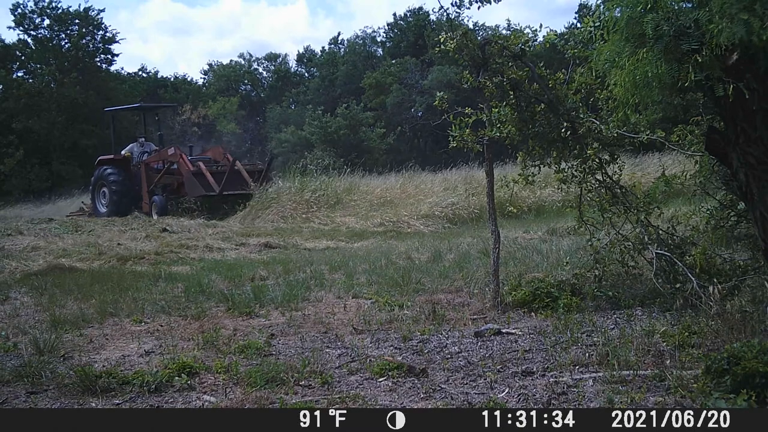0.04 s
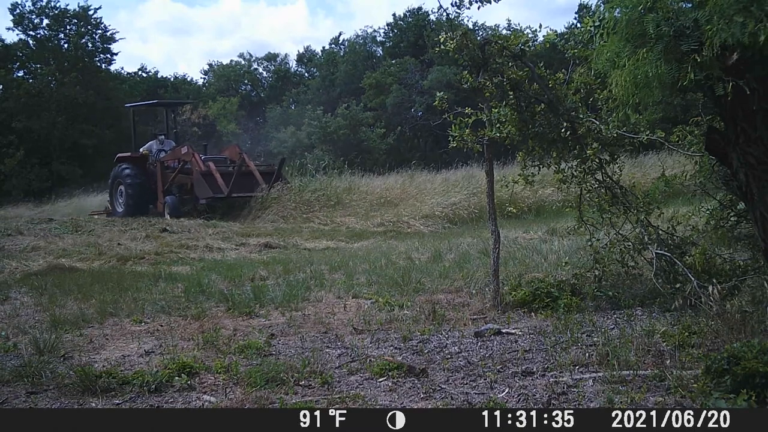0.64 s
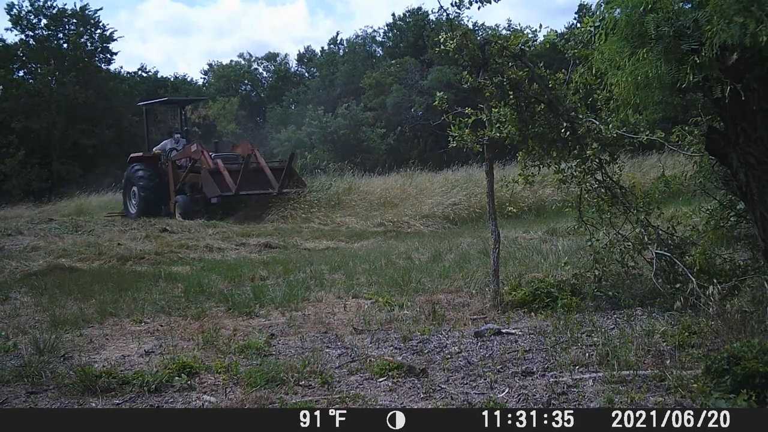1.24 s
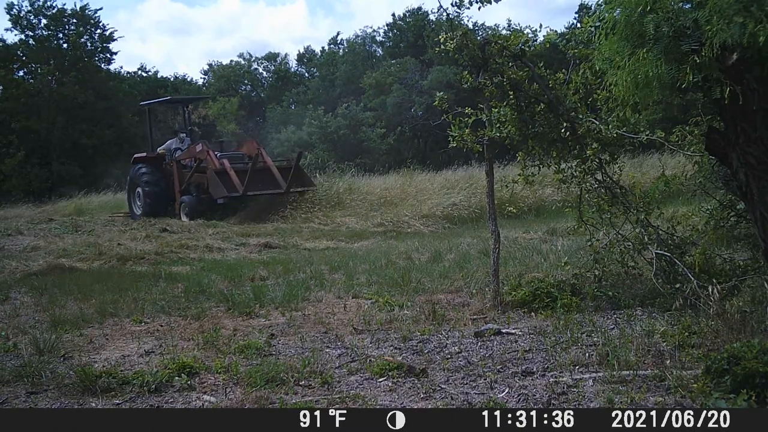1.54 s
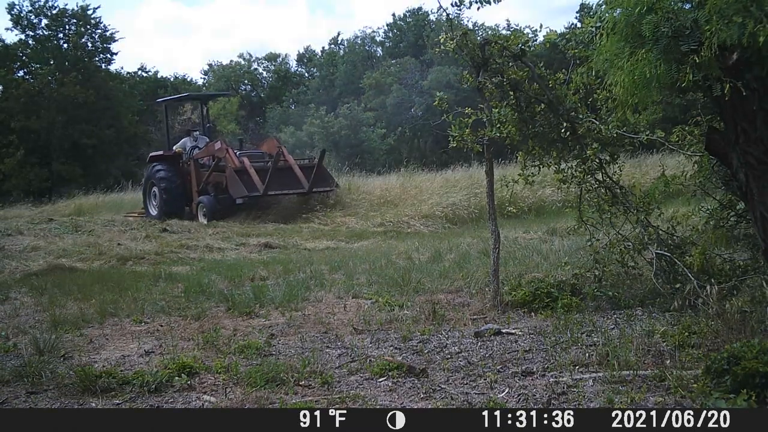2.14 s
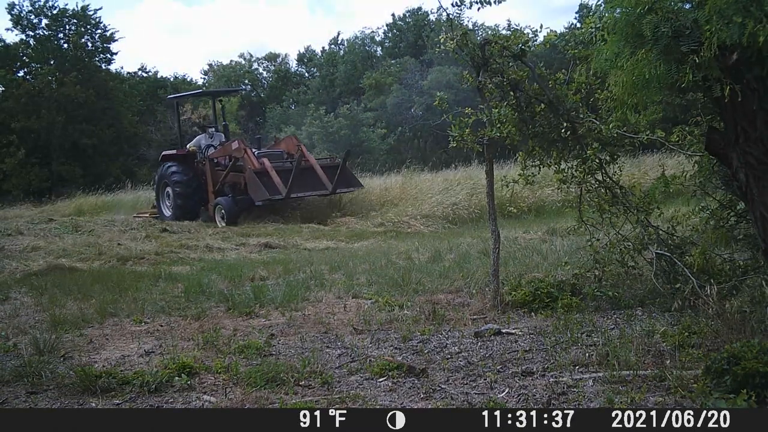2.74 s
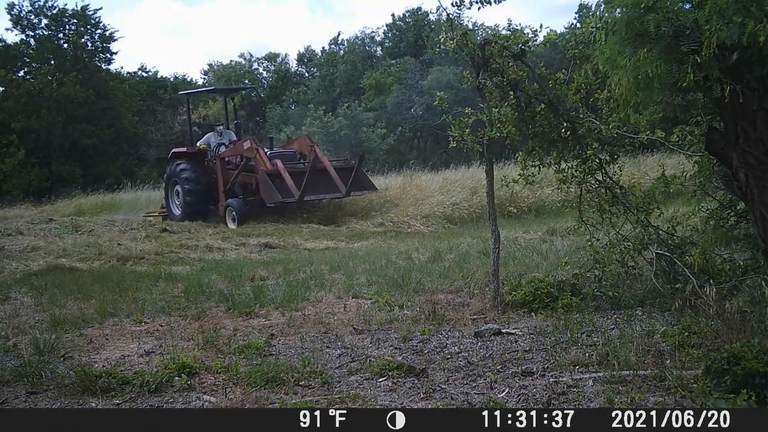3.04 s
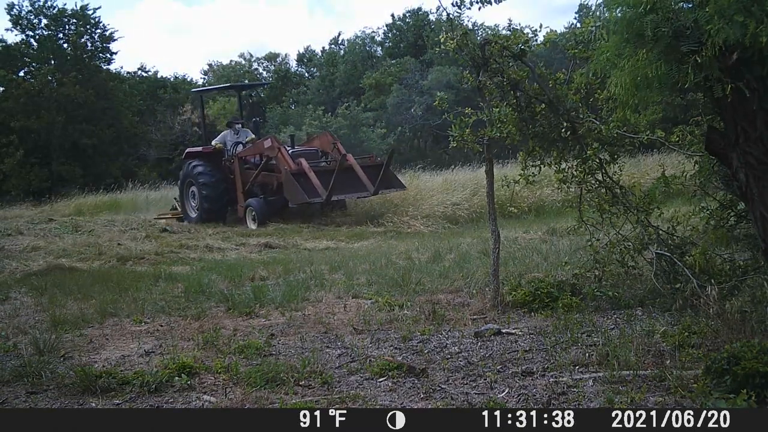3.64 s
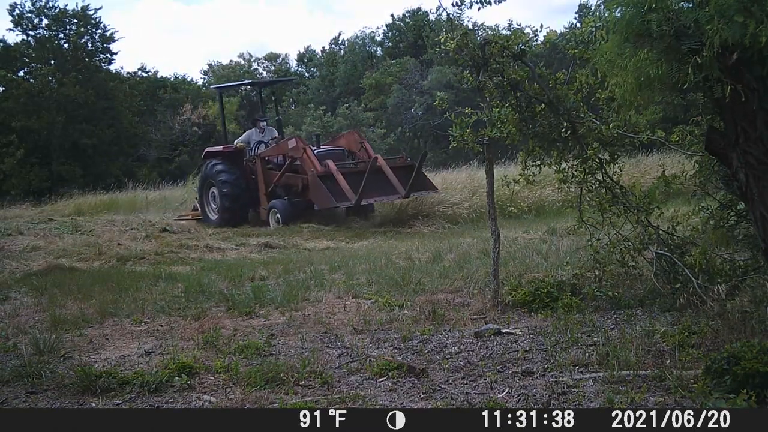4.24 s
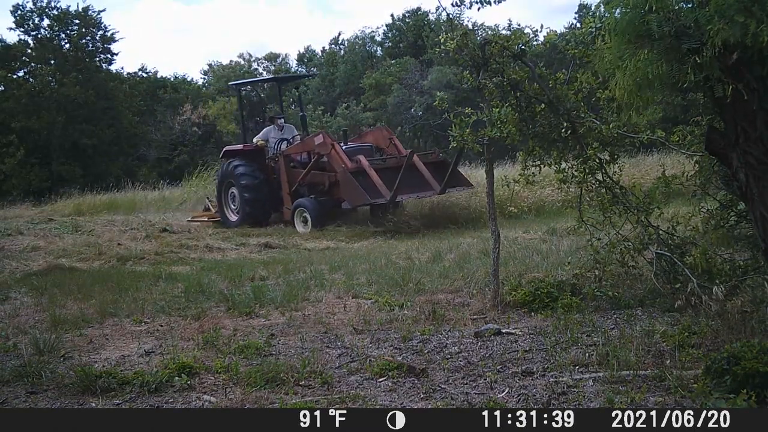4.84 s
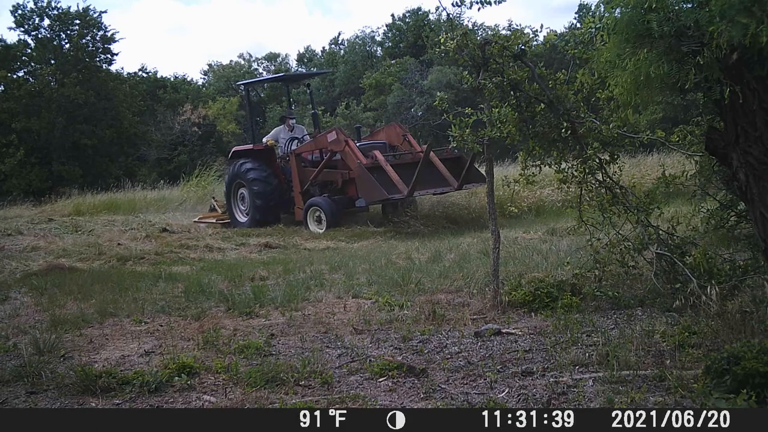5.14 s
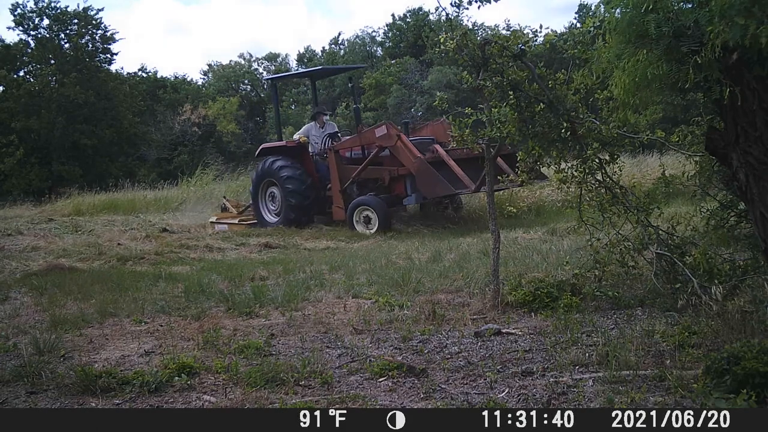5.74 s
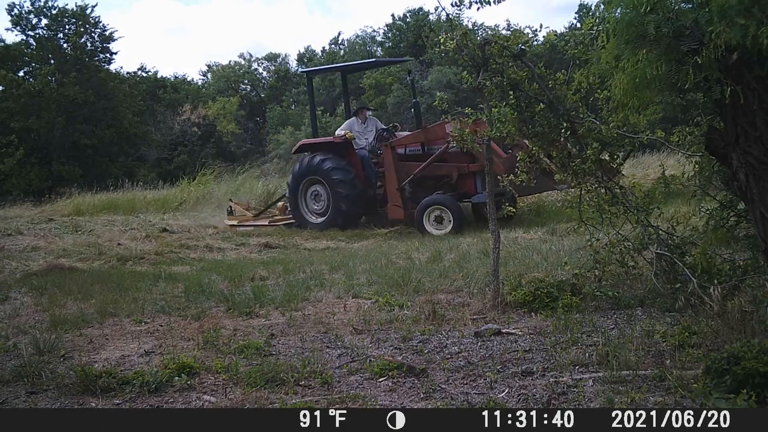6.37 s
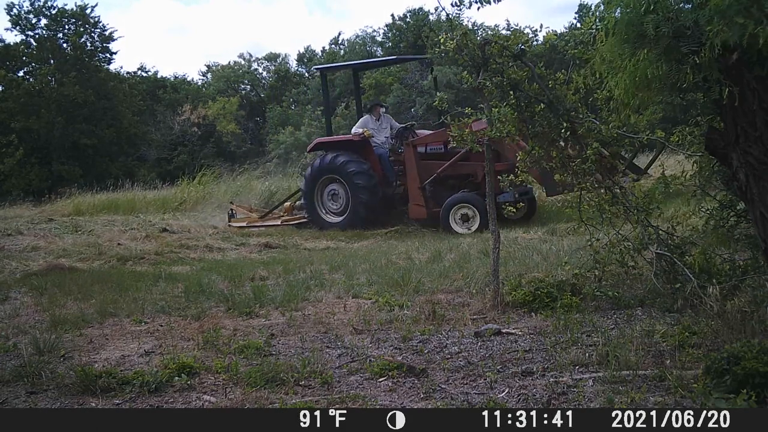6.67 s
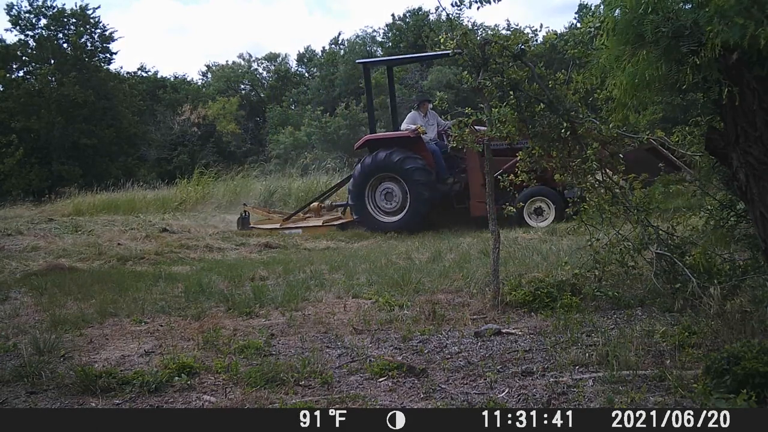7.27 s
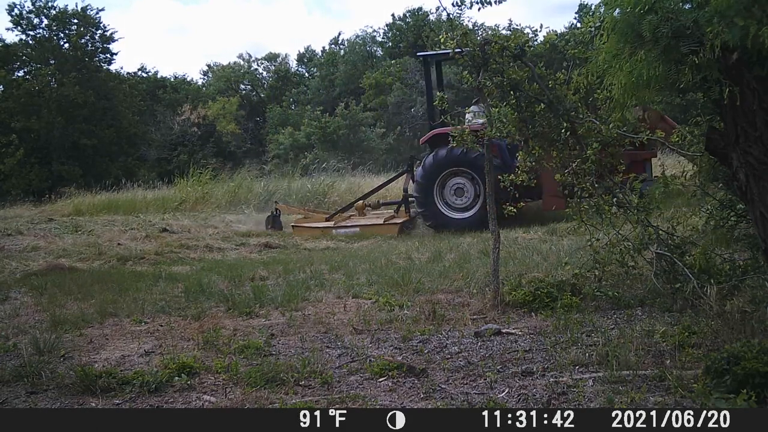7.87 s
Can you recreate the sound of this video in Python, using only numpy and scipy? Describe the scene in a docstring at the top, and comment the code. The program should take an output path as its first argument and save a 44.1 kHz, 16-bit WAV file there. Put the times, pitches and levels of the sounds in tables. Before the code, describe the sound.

A diesel tractor pulls a rotary mower across an open field toward a fixed microphone. Its deep, steady exhaust drone sits over the throb and low rumble of the blades and slowly grows louder throughout. Far beneath it are a light engine clatter, a faint gear whine and the fizz of dry grass being cut, with a few small metal ticks and twig snaps.

```python
"""A deep, steady drone grows slowly louder: a four-cylinder diesel tractor is mowing toward the listener.
The drone is its exhaust, pulsing at the firing rate over the throb of a rotary cutter's blades.
Far below it, combustion knocks ring the engine block, cut stalks of dry grass fizz and crackle,
meshing gears whine faintly, and now and then a twig snaps under the deck."""
import sys
import numpy as np
from scipy import signal
from scipy.fft import rfft, irfft
from scipy.io import wavfile

SR = 44100
rng = np.random.default_rng(int(sys.argv[2]) if len(sys.argv) > 2 else 0)


def pcm_store(signal):
    """Save signal as 16-bit PCM."""
    levels = np.round(np.clip(np.atleast_2d(signal), -1, 1) * 32767)
    wavfile.write(sys.argv[1], SR, levels.astype(np.int16).T)


N = 348831
TIME = np.arange(N) / SR


# Lines of unequal cylinders. Each row: multiple of the cycle rate, level in dB against the firing line.
CYLINDER_LINES = [(1, -41), (2, -26.5), (3, -37), (5, -31), (6, -38), (7, -30.5), (9, -53), (10, -56),
                  (12, -58), (13, -66), (15, -59.5)]

def exhaust(cycle, exhaust_db, octave_db=-22.5, octave_follow=0.98, waver=0.12):
    """Periodic pulses form a harmonic series; the muffler leaves the firing tone and weak other lines."""
    angle = 2 * np.pi * cycle
    firing = np.cos(4 * angle)
    octave_gain = amp(octave_db + (octave_follow - 1) * (exhaust_db - exhaust_db.mean()))
    octave = -octave_gain * np.cos(8 * angle)
    uneven = np.zeros(N)
    for multiple, db in CYLINDER_LINES:
        strength = amp(db) * (1 + waver * drift(rate_hz=0.83))
        uneven += strength * np.sin(multiple * angle + 2 * np.pi * rng.random())
    return np.sqrt(2) * amp(exhaust_db) * (firing + octave + uneven)


# Blade tones. Each row: multiple of the blade passing rate, level in dB against the firing line.
BLADE_LINES = [(1, -29), (2, -33.5), (3, -39)]
# Turbulence under the deck. Each row: frequency in Hz, relative spectral level in dB.
RUMBLE_SPECTRUM = [(3, -15), (12, -5), (38, -2), (60, 3), (80, -7), (100, -9.5), (125, -21), (145, -25),
                   (160, -33.5), (195, -30.5), (270, -33.5), (560, -38), (800, -49), (2000, -78)]

def cutter(cycle, exhaust_db, passes_per_cycle=1.777, rumble_db=-22.0, rumble_follow=0.34):
    """Blades geared to the engine beat the air at their passing rate; turbulence adds a broad rumble."""
    angle = 2 * np.pi * cycle * passes_per_cycle
    throb = sum(amp(db) * np.sin(k * angle + 2 * np.pi * rng.random()) for k, db in BLADE_LINES)
    trend_db = exhaust_db.mean() + rumble_follow * (exhaust_db - exhaust_db.mean())
    rumble = unit(colour(rng.standard_normal(N), RUMBLE_SPECTRUM))
    return np.sqrt(2) * amp(exhaust_db) * throb + amp(trend_db + rumble_db) * rumble


# Broad response of block and injectors. Each row: frequency in Hz, relative spectral level in dB.
BLOCK_SPECTRUM = [(150, -35.5), (450, -14.5), (680, -8), (780, -6.5), (850, -0.5), (1000, -2), (1050, -7.5),
                  (1220, -4), (1320, -10), (1450, -8.5), (1520, -15.5), (2050, -17), (3300, -22),
                  (4800, -37.5)]
INJECTOR_SPECTRUM = [(1000, -35), (2080, -24), (2200, -3.5), (2450, -3.5), (2620, -1.5), (2740, -22),
                     (3600, -29), (8000, -41)]
# Their resonances. Each row: frequency in Hz, width in Hz, lift in dB.
BLOCK_MODES = [(489, 33, 5.5), (690, 24, 4), (967, 45, 3.5), (1087, 16, 6), (1125, 50, 9.5), (1433, 22, 3),
               (1670, 160, 6.5), (2800, 98, 6), (3030, 92, 5.5), (3310, 50, 4.5), (3500, 50, 3)]
INJECTOR_MODES = [(2205, 120, 2.4), (2374, 120, 9), (2585, 61, 4)]
# Knocks of loose steel. Each row: start in seconds, relative level in dB.
STEEL_CLACKS = [(0.9647, -56), (1.2037, -51.5), (1.6237, -49.5), (1.8762, -52), (2.343, -49), (2.5612, -47),
                (2.8789, -48), (2.9452, -44), (3.309, -48), (6.0891, -47), (6.6563, -47), (6.8951, -43.5)]

def clatter(cycle, firing_hz, clack_db=-4.5):
    """Impacts excite resonant modes: combustion shakes the block, injectors and loose steel ring higher."""
    combustion = knocking(cycle, firing_hz, decay_s=0.0052, scatter_db=2.3, wash=1.5, repeat=0.26)
    ticking = knocking(cycle, firing_hz, decay_s=0.0055, scatter_db=2.5, wash=0.57, repeat=0.12)
    block_db = level(firing_hz, mid_db=-57.5, near_share=0.78, db_per_hz=0.87)
    block_db += swell(centre_s=5.6, width_s=2.0, lift_db=1)  # the block's open side faces the listener
    injector_db = level(firing_hz, mid_db=-62.5, near_share=1.25, db_per_hz=1.4)
    injector_db += swell(centre_s=2.97, width_s=0.25, lift_db=2.0)  # the rattle flares once
    block = amp(block_db) * colour(unit(combustion), BLOCK_SPECTRUM, BLOCK_MODES)
    injectors = amp(injector_db) * colour(unit(ticking), INJECTOR_SPECTRUM, INJECTOR_MODES)
    clacks = colour(bursts(STEEL_CLACKS, decay_s=0.0045), INJECTOR_SPECTRUM, INJECTOR_MODES)
    return block + injectors + amp(clack_db) * clacks


# Knocks of one four-stroke cycle. Each row: place in the cycle from 0 to 1, relative strength in dB.
CYCLE_KNOCKS = [(.005, 1), (.27, -1), (.44, -4), (.52, -6.5), (.75, -4)]

def knocking(cycle, firing_hz, decay_s, scatter_db, wash, repeat):
    """Damped impacts modulate noise over a steady wash; the share `repeat` of its power is periodic."""
    envelope = np.full(N, wash)
    for place, db in CYCLE_KNOCKS:
        count, fraction = np.divmod(cycle - place + 1, 1)
        force = amp(db + scatter_db * rng.standard_normal(256))[count.astype(int)]
        age_s = fraction * 4 / firing_hz
        envelope += force * np.exp(-age_s / decay_s)
    grain = rng.standard_normal(round(4 * SR / firing_hz.mean()))  # one cycle of noise
    recurring = grain[(cycle % 1 * len(grain)).astype(int)]
    return envelope * (np.sqrt(repeat) * recurring + np.sqrt(1 - repeat) * rng.standard_normal(N))


# Fizz of cut grass. Each row: frequency in Hz, relative spectral level in dB.
GRASS_SPECTRUM = [(1500, -16.5), (3000, -4), (3650, -8.5), (3950, 2), (4250, -4), (4850, -9), (5330, -3.5),
                  (5550, -4), (5880, 1.5), (6400, 0), (6650, -4.5), (6920, 3.5), (7200, -6.5), (7700, -28)]
# Its gradual rise. Each row: time in seconds, relative level in dB.
GRASS_LEVELS = [(0.05, -75.5), (2.29, -73), (3.59, -71), (7.48, -70), (7.85, -69)]

def grass(cycle, firing_hz, stalks_per_s=1500, spread_db=1.5, stalk_db=-5.0, level_db=0.5):
    """Stalks breaking at random make shot noise, which blends with the pulsing hiss of the engine."""
    size = amp(spread_db * np.minimum(rng.exponential(1, N), 4))
    stalks = size * rng.choice([-1, 1], N) * (rng.random(N) < stalks_per_s / SR)
    hiss = knocking(cycle, firing_hz, decay_s=0.0071, scatter_db=2.0, wash=0.7, repeat=0.037)
    fizz = unit(amp(stalk_db) * unit(stalks) + unit(hiss))
    return amp(curve(GRASS_LEVELS) + level_db) * colour(fizz, GRASS_SPECTRUM)


# Gear meshes. Each entry: tone name, teeth that mesh in one four-stroke cycle.
MESH_TEETH = {"low": 48, "middle": 64, "high": 76}
# How they carry. Each entry: tone name, level at mid distance in dB, share of the gain from nearing,
# lift in dB per Hz of sag in the firing rate.
WHINE_LEVELS = {"low": (-78.5, 0.086, 1.5), "middle": (-71, 0.89, .6), "high": (-67, .15, -.6)}
# Brief swells. Each row: tone name, centre in seconds, width in seconds, lift in dB.
WHINE_SWELLS = [("low", .8, .3, 6), ("low", 1.68, .42, 13), ("middle", 5.95, .4, 6),
                ("high", 5.87, .55, 6.5), ("middle", 6.85, 0.44, 8.5), ("high", 6.75, .35, 6.5)]

def gears(cycle, firing_hz, flutter=0.25, slip_rad=0.45):
    """Gears whine at their tooth meshing rate; backlash modulates each tone in amplitude and phase."""
    whine = np.zeros(N)
    for name, teeth in MESH_TEETH.items():
        db = level(firing_hz, *WHINE_LEVELS[name])
        db += sum(swell(*row) for which, *row in WHINE_SWELLS if which == name)
        tone = np.sin(2 * np.pi * teeth * cycle + slip_rad * drift(rate_hz=4.8))
        whine += amp(db) * unit((1 + flutter * drift(rate_hz=7.2)) * tone)
    return whine


# Breaking twigs. Each row: start in seconds, relative level in dB.
TWIG_SNAPS = [(3.1144, -60), (3.1774, -59.5), (3.4067, -56), (3.8955, -55), (5.2121, -56), (5.3288, -48.5),
              (5.6341, -52), (7.0783, -53), (7.4485, -52)]
# Their brightness. Each row: frequency in Hz, relative spectral level in dB.
TWIG_SPECTRUM = [(1500, -23), (4000, -8.5), (6200, 1.5), (7300, -5.5), (8000, -38.5)]

def twigs(snap_db=-7.0):
    """Brittle fracture releases the strain in a dry twig as one short, bright tick."""
    return amp(snap_db) * colour(bursts(TWIG_SNAPS, decay_s=0.0033), TWIG_SPECTRUM)


def level(firing_hz, mid_db, near_share, db_per_hz, cruise_hz=59.7):
    """Level in dB follows spherical spreading along a straight path, and the sag of speed under load."""
    ahead_m, abreast_m, drive_m_per_s = 22.0, 12.0, 2.3
    distance_m = np.hypot(abreast_m, ahead_m - drive_m_per_s * TIME)
    spreading_db = -20 * np.log10(distance_m)
    nearing_db = spreading_db - spreading_db.mean()
    return mid_db + near_share * nearing_db + db_per_hz * (cruise_hz - firing_hz)


def colour(x, spectrum, modes=(), size=16384):
    """A minimum-phase filter of unit energy shapes the spectrum; its resonances ring after each blow."""
    hz = np.fft.rfftfreq(size, 1 / SR)
    points_hz, points_db = np.transpose(spectrum)
    db = np.interp(np.log(hz + 1), np.log(points_hz + 1), points_db)
    for centre, width, lift in modes:
        db += lift / (1 + (2 * (hz - centre) / width) ** 2)
    log_gain = np.log(amp(np.r_[db, db[-2:0:-1]]))
    response = np.exp(np.conj(signal.hilbert(log_gain)))
    taps = np.fft.ifft(response).real[:size // 2]
    return signal.oaconvolve(x, taps / np.linalg.norm(taps))[:N]


def bursts(events, decay_s):
    """Each impulse starts a puff of noise that decays exponentially."""
    impulses = np.zeros(N)
    for start_s, db in events:
        impulses[round(start_s * SR)] += amp(db)
    envelope = signal.lfilter([1], [1, -np.exp(-1 / (decay_s * SR))], impulses)
    return envelope * rng.standard_normal(N)


def drift(rate_hz):
    """Low-passed noise gives a slow random fluctuation of rms 1."""
    hz = np.fft.rfftfreq(N, 1 / SR)
    return unit(irfft(rfft(rng.standard_normal(N)) / (1 + (hz / rate_hz) ** 4), N))


def swell(centre_s, width_s, lift_db):
    """A Gaussian rise and fall in dB, with its width taken at half height."""
    return lift_db * 0.5 ** ((2 * (TIME - centre_s) / width_s) ** 2)


def curve(table):
    """Linear interpolation joins a table's points in time."""
    return np.interp(TIME, *np.transpose(table))


def amp(db):
    """Decibels become an amplitude ratio."""
    return 10 ** (np.asarray(db) / 20)


def unit(x):
    """Normalises to rms 1."""
    return x / np.sqrt(np.mean(x ** 2) + 1e-20)


# Engine speed, sagging in thick grass until the governor catches it.
# Each row: time in seconds, firing rate in Hz.
FIRING_RATE = [(0.0, 59.61), (0.55, 60.11), (0.75, 59.61), (1.18, 60.29), (1.45, 59.45), (2.18, 59.58),
               (2.46, 60.18), (2.88, 59.39), (3.44, 60.14), (4.64, 60.0), (5.27, 59.16), (5.52, 60.14),
               (6.02, 59.27), (6.19, 59.76), (6.52, 59.06), (7.15, 59.8), (7.52, 58.79), (7.9, 59.37)]

def scene():
    """The sources add by superposition; one crankshaft keeps all their periodic parts in step."""
    firing_hz = curve(FIRING_RATE)
    exhaust_db = level(firing_hz, mid_db=-16, near_share=0.66, db_per_hz=0.64)
    cycle = np.cumsum(firing_hz) / (4 * SR)  # four-stroke cycles elapsed, four firings in each
    engine = exhaust(cycle, exhaust_db) + clatter(cycle, firing_hz) + gears(cycle, firing_hz)
    mowing = cutter(cycle, exhaust_db) + grass(cycle, firing_hz) + twigs()
    return (engine + mowing)[None]


def record(dry, notch_hz=634, notch_width_hz=80, cutoff_hz=7450):
    """The microphone acts as a linear filter, with one narrow midrange notch and a treble cutoff."""
    notch = signal.iirnotch(notch_hz, notch_hz / notch_width_hz, fs=SR)
    lowpass = signal.firwin(511, cutoff_hz, window=("kaiser", 9), fs=SR)
    return signal.oaconvolve(signal.lfilter(*notch, dry), lowpass[None], "same")


dry = scene()
out = record(dry)
pcm_store(out)
```